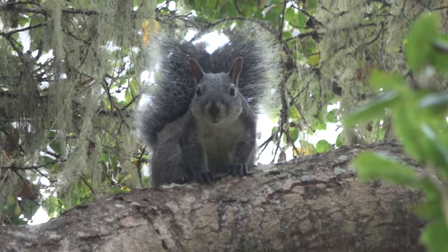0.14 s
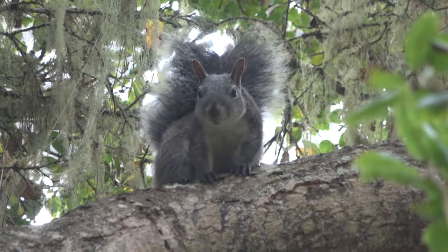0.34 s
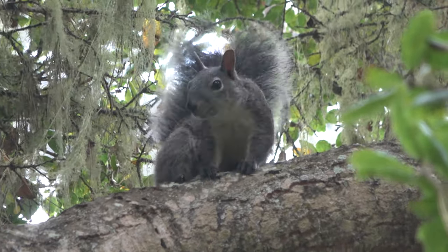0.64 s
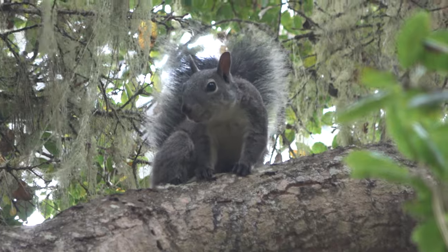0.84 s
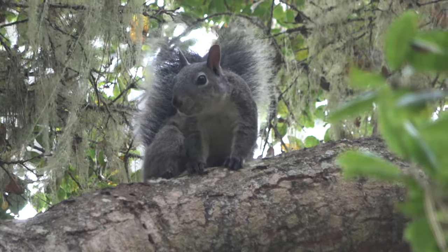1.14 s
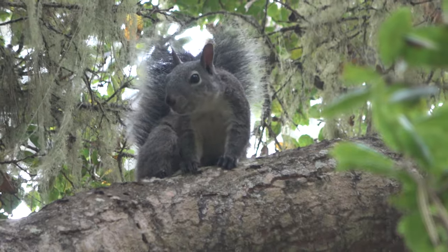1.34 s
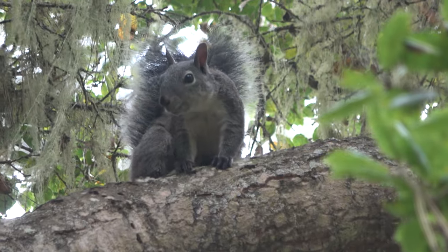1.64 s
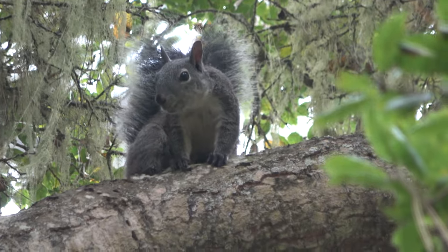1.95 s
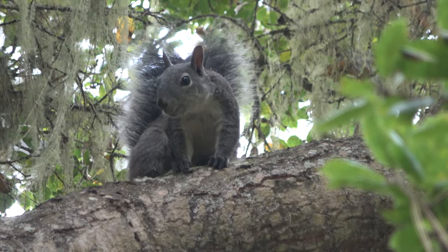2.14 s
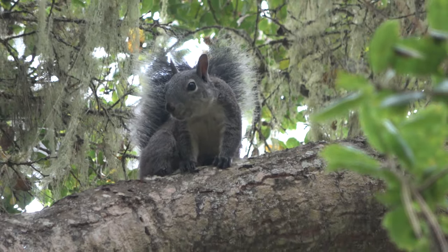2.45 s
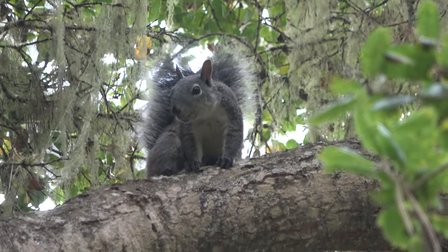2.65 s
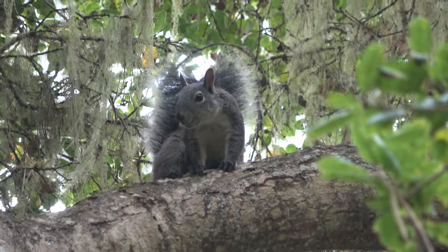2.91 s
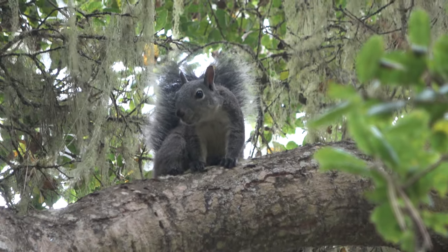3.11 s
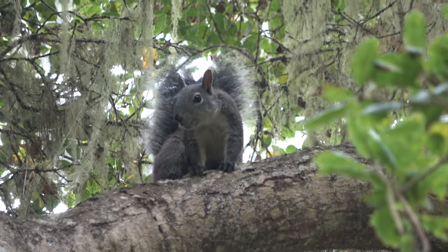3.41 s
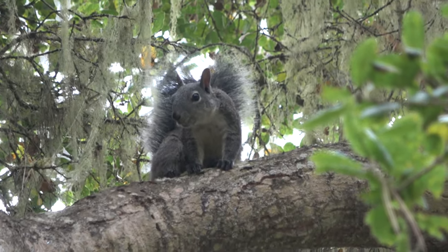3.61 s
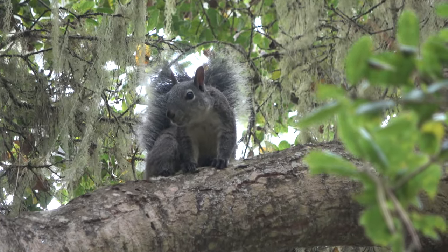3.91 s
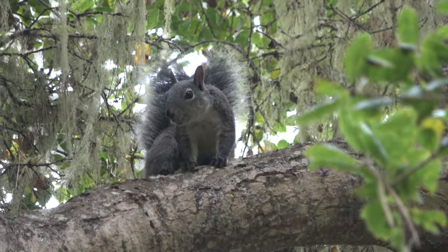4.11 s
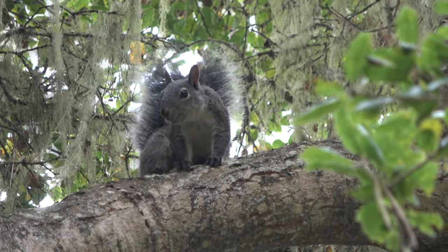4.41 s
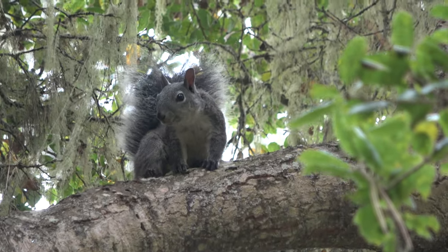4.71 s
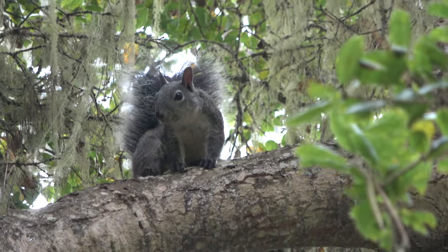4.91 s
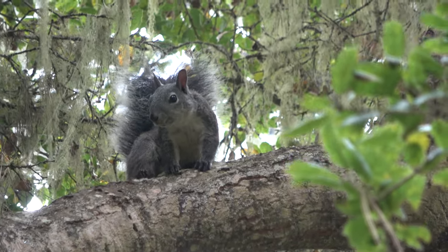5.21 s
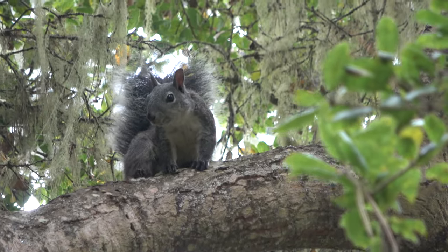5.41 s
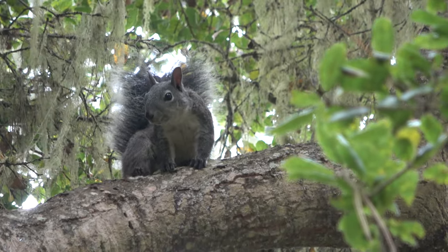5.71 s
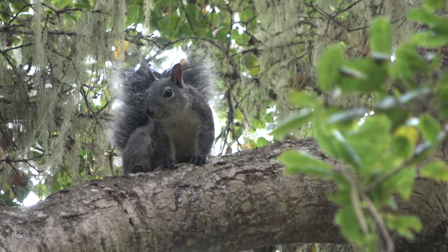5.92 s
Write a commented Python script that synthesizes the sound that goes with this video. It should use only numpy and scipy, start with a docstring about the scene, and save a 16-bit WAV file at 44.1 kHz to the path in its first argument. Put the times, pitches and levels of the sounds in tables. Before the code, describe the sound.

A squirrel sits on a tree limb and scolds. After almost a second of soft woodland air and a dry tick, harsh chirping barks come about four a second, each answered by a small throaty grunt. Gradually they spread out, growing longer, purer and more whistle-like, with fainter grunts. Short reflections ring from the trunks. After the thirteenth call only low steady rumble, ticks and slight rustles remain. Outdoor stereo pickup, fairly near.

```python
"""Squirrel alarm barks among trees

A squirrel gives thirteen barks: a rising whistle-like voice that breaks into a rasp when pushed high.
Whistle and rasp are sums of sine waves, with throat-shaped noise in the rasp; the voice clears as it goes on.
Low falling grunts follow all but one bark, and a fading noise tail makes the echo from the trees.
Behind are shaped noise for rumble, leaf hiss, ticks and rustles, and a faint bird made of gliding sines."""
import sys
import numpy as np
from scipy import signal
from scipy.fft import rfft, irfft
from scipy.io import wavfile
from scipy.ndimage import uniform_filter1d

SR = 44100
rng = np.random.default_rng(int(sys.argv[2]) if len(sys.argv) > 2 else 0)


def store_wav(level_fs):
    """Save 16-bit WAV to argv[1]."""
    pcm = np.round(np.clip(np.atleast_2d(level_fs), -1, 1) * 32767)
    wavfile.write(sys.argv[1], SR, pcm.T.astype(np.int16))


N = 267025  # length of the scene in samples

# Background noise colour: f/Hz, relative level/dB
AIR_COLOUR = [(15, -20), (25, -4.5), (96, -8.5), (179, -0.5), (290, -1), (360, -4), (484, -7.5),
              (525, -11.5), (687, -9), (875, -17.5), (1180, -18), (2020, -31), (4060, -39.5), (6430, -36),
              (15600, -44.5)]
# How alike the background is left and right: f/Hz, likeness (0-1)
AIR_LIKENESS_BY_PITCH = [(60, 0.98), (180, 0.99), (550, 0.99), (1650, 0.89), (4970, 0.76), (15000, 0.16)]
# Background balance: f/Hz, left minus right/dB
AIR_LEFT_RIGHT = [(60, -1.5), (150, -4.5), (380, -4.5), (950, -1.5), (2380, -3.0), (5980, 0), (15000, -0.5)]
# Deep rumble that comes and goes: t/s, level/dB
RUMBLE_LEVEL = [(0.0, -82), (1.9, -50), (2.55, -57), (4.2, -70), (4.6, -57), (6.05, -79)]
# Faint bird notes: t/s, length/s, first f/Hz, top f/Hz, level before its arch and flicker/dB
BIRD_NOTES = [(0.174, .18, 6600, 7330, -65), (0.502, 0.16, 6750, 7360, -73)]
# Leaf rustles: t/s, length/s, level before grain, edges and balance/dB, centre f/Hz
LEAF_RUSTLES = [(0, 0.032, -68, 8000), (0.329, 0.12, -57, 8000), (0.554, 0.24, -73, 6500),
                (3.97, 0.028, -54, 6000), (3.981, 0.086, -63, 6000), (5.093, 0.13, -61.5, 6800),
                (5.988, 0.067, -67, 7100)]
# Ticks: t/s, relative level/dB, centre f/Hz, left minus right/dB
TICK_EVENTS = [(0.0653, -45, 5100, -0.5), (0.352, -18, 3230, -7), (0.4284, -35.5, 7300, -5),
               (0.4354, -40, 7850, -2.5), (0.471, -38, 6070, -3.0), (0.7263, -44.5, 7150, -2.5),
               (1.2424, -37, 3400, -4), (4.4026, -40, 5100, 2), (4.5875, -32, 3860, -6),
               (4.79, -44, 6410, -1.0), (4.9288, -41, 3260, -1), (5.1074, -39, 6400, -5.0),
               (5.128, -41, 6320, 8), (5.4256, -45, 5500, -6), (5.5653, -38, 5000, -7),
               (5.691, -39.5, 6660, -4), (5.827, -39.5, 6130, -0.5), (5.9945, -38, 5840, -1)]
# Echo from the trees: f/Hz, time to fade by 60 dB/s, relative level/dB, stereo width (0-1)
TREE_ECHO = [(500, 0.17, -6, 0.2), (1514, 0.24, -11.5, 0.1), (2040, 0.65, -3.5, 0.03),
             (3020, 0.6, -7.5, 0.15), (4430, 0.45, 1, 0), (6500, 0.32, -4, 0.49), (14000, 0.32, -3.5, 0.34)]
# Scatter off the near leaves, opposite in the two channels: f/Hz, level/dB
NEAR_LEAF_SCATTER = [(800, -25), (2200, -30), (3500, -24), (5000, -12), (8000, -10), (15000, -9)]
# Grunts: t/s, level before fade and flicker/dB, start f/Hz
GRUNT_EVENTS = [(0.941, -35, 693), (1.168, -33.5, 720), (1.392, -34.5, 709), (1.619, -33, 702),
                (1.866, -37, 661), (2.11, -42.5, 674), (2.365, -37.5, 567), (2.641, -40.5, 557.5),
                (2.912, -51, 548), (3.185, -46, 548), (3.865, -57, 538), (4.228, -57, 542)]
# Grunt partials: multiple of the pitch, level before the lift of weaker grunts/dB
GRUNT_PARTIALS = [(1, 4), (2, -1), (3, -3.5)]
# Throat and mouth resonances in three ranges: f/Hz, width/Hz, relative level/dB
LOW_RESONANCES = [(2404, 500, -8), (2830, 330, -4.5), (3073, 66, -3.5), (3429, 550, 0.5), (3873, 450, -15)]
MID_RESONANCES = [(5380, 1120, -11.5), (6000, 550, -25), (6540, 910, 5), (8000, 2060, -8)]
HIGH_RESONANCES = [(10370, 900, 1), (11820, 1150, 5.5), (13700, 1600, -4.5), (15050, 1700, -6)]
# Overtones in the same three ranges: base level at effort 0/dB, gain per dB of effort/dB
EFFORT_TO_OVERTONES = [(-38.5, .5), (-38.5, 0.94), (-46, 1.33)]
# Barks: start t/s; knee, top, push and end t/s after the start; f/Hz at start, knee, top and end
# before sag and waver; base fundamental level/dB, effort at the push/dB, lift at 2-4 kHz/dB,
# lift at 5-9 kHz/dB, cycles per slow beat, beat level/dB, base chaos (0-1)
BARK_EVENTS = [ (0.838, 0.019, 0.036, 0.054, 0.09, 992, 1428, 1669, 1593, -27, 1.5, -0.65, -0.5, 3, 0.5, 0.99),
               (1.075, 0.011, 0.02, 0.046, 0.086, 1115, 1404, 1646, 1646, -28, -0.5, -0.61, 0, 3, 1.5, 0.97),
               (1.297, .014, .028, 0.046, 0.084, 1178, 1373, 1672, 1555, -27.5, -0.5, -1, 1, 3, 0.5, 0.91),
               (1.519, .012, 0.026, 0.05, 0.092, 1173, 1355, 1673, 1600, -28, -1.5, 0.28, 2, 3, 0, 0.84),
               (1.753, .015, 0.031, 0.047, 0.1, 1147, 1393, 1682, 1576, -28.5, -1.5, 0, 2.5, 2, 1.5, 0.5),
               (1.990, 0.016, 0.047, .055, 0.11, 1171, 1410, 1684, 1572, -29.5, -0.5, -1, 1, 3, -2.5, 0.21),
               (2.235, 0.023, .058, 0.074, 0.11, 1217, 1486, 1662, 1636, -30, -2, -0.53, 3, 3, -6, 0.19),
               (2.496, 0.043, .085, 0.085, 0.11, 1192, 1567, 1635, 1585, -29, -4.5, 0.69, 4.5, 4, -10, 0.47),
               (2.766, .042, 0.097, .100, .124, 1224, 1545, 1579, 1512, -30, -4.5, 1, 2.5, 4, -12, 0.08),
               (3.042, 0.054, 0.098, 0.084, 0.12, 1155, 1545, 1563, 1535, -28, -5, 0.52, 0.5, 4, -12.5, 0.51),
               (3.337, 0.076, 0.086, 0.11, 0.13, 1172, 1554, 1555, 1519, -29.5, -9, -0.18, 0, 4, -11, 0.63),
               (3.727, 0.029, .093, 0.1, 0.12, 1246, 1317, 1512, 1445, -30.5, -13.5, -1.25, 0, 4, -12, 0.095),
               (4.085, 0.054, .100, 0.15, .123, 1207, 1313, 1430, 1425, -29.5, -14, -0.62, 0, 4, -12, .08),
               ]
# Balance of the fundamental: t/s, left minus right/dB
FUNDAMENTAL_LEAN = [(0.85, -2.5), (1.1, 1), (2.1, 1), (3.1, 3), (4.2, -1)]

LEFT_RIGHT = np.array([[1], [-1]])  # opposite signs in the two channels
CUTOFF_HZ = 15750
AIR_DB = -42.5
TICK_OCTAVES = 0.62
FAINT_TICKS, FAINT_TICK_DB = 4, -49  # extra ticks at random times, around this relative level
NEAR_S = .004  # decay time of the near scatter

# Grunts: higher ones last longer, and weaker ones have stronger high multiples
GRUNT_FALL = 0.49  # share of the pitch lost by the end
GRUNT_LOW_HZ, GRUNT_S, GRUNT_S_PER_KHZ = 553.5, 0.0297, 0.149
GRUNT_FULL_DB, WEAK_LIFT = -35.5, 0.3  # lift in dB per multiple for each dB below full

THROAT_DIP_HZ = 1750  # the throat passes little just above the fundamental
# The series starts hoarse and clears around this time, this gradually
CLEARS_S, CLEARS_OVER_S = 2.1, .28
# Barks that reach this high break around the knee, this quickly
BREAKS_ABOVE_HZ, BREAK_S = 1530, .008
# Chaos grows along a hoarse bark, and with each 1000 Hz/s of glide
CHAOS_GROWTH, GLIDE_CHAOS = .25, .035
# The fundamental swells up to a full pitch, which is lower for a hoarse voice
FULL_HZ, HOARSE_EARLIER_HZ, SWELL_DB_PER_KHZ = 1430, 40, 92
# A hoarse voice loses fundamental from knee to top, and fades after the push
BROKEN_LOSS_DB, BROKEN_FADE_DB_PER_S = 4.5, 80
# Effort builds to the push, then slackens; a lower start is a softer start
ONSET_EFFORT_DB, PUSH_BEND, SLACK_DB_PER_S = -24, 2.03, 150
ONSET_HZ, ONSET_DB_PER_KHZ = 1180, 45
FOURTH_RING = 0.13  # power of the resonance heard as the fourth multiple crosses it
CLOSING_DB, CLOSING_S = 5.5, 0.021  # a clear bark flares at 2-4 kHz as it is cut off
END_SAG, END_SAG_S = 0.065, 0.013  # the pitch drops as the folds close, most in a clear voice
OPENING_S, RELEASE_S, HOARSE_RELEASE_S = .004, .007, .014  # edges of the overtones
# Near the push a hoarse fundamental splits: pitch ratio, full level, time spread
UNDERTONE, UNDERTONE_DB, UNDERTONE_S = 0.79, -5, 0.0094


def amp(db):
    """Turn decibels into gain."""
    return 10 ** (np.asarray(db) / 20)


def rms_one(x):
    """Scale a sound to an average (rms) strength of 1."""
    return x / np.sqrt(np.mean(x ** 2) + 1e-20)


def at_hz(points, hz, column=1):
    """Read a table between its rows, along a log-frequency axis."""
    points = np.array(points)
    return np.interp(np.log(hz), np.log(points[:, 0]), points[:, column])


def add(out, at, x):
    """Mix x into out from sample at."""
    out[..., at:at + x.shape[-1]] += x[..., :N - at]


def edges(n, rise_s, fall_s):
    """Give a gain curve with a soft start and end."""
    t = np.arange(n) / SR
    return np.clip(t / rise_s, 0, 1) * np.clip(t[::-1] / fall_s, 0, 1)


def wobble(n, hz, count=1):
    """Make slow random motion from low-passed noise, rms 1, in count unrelated rows."""
    sos = signal.butter(2, hz, fs=SR, output="sos")
    rows = signal.sosfilt(sos, rng.standard_normal((count, n + 800)))[:, 800:]  # skip the filter's start
    return np.squeeze(rows / np.sqrt(np.mean(rows ** 2, axis=1, keepdims=True)))


def wide_noise(n, hz, octaves, width):
    """Make a stereo noise burst around hz, rms 1."""
    band = [hz / 2 ** (1.16 * octaves), min(hz * 2 ** octaves, .45 * SR)]
    sos = signal.butter(2, band, "band", fs=SR, output="sos")
    mid, side = signal.sosfilt(sos, rng.standard_normal((2, n)))
    return rms_one(mid + width * side * LEFT_RIGHT)


def air():
    """Far rumble and leaf hiss: noise shaped by frequency in colour, stereo likeness and balance."""
    hz = np.maximum(np.arange(N // 2 + 1) * SR / N, 1)
    mid, side = rfft(rng.standard_normal((2, N)))
    alike = np.clip(at_hz(AIR_LIKENESS_BY_PITCH, hz), 0, 1)
    lean_db = at_hz(AIR_LEFT_RIGHT, hz) / 2
    both = np.sqrt(1 + alike) * mid + np.sqrt(1 - alike) * side * LEFT_RIGHT
    noise = irfft(both * amp(at_hz(AIR_COLOUR, hz) + lean_db * LEFT_RIGHT), N)
    flicker = np.repeat(wobble(N // 50 + 1, 120), 50)[:N]  # each value is held for 50 samples
    return amp(AIR_DB + 0.21 * flicker) * rms_one(noise)


def rumble():
    """Deep rumble: low band-passed noise, alike in both channels."""
    s, level_db = np.transpose(RUMBLE_LEVEL)
    at, end = round(s[0] * SR), round(s[-1] * SR)
    db = np.interp(np.arange(at, end) / SR, s, level_db)
    sos = signal.butter(2, [28, 85], "band", fs=SR, output="sos")
    noise = signal.sosfilt(sos, rng.standard_normal(len(db) + 9000))[9000:]
    out = np.zeros(N)
    add(out, at, amp(db) * rms_one(noise))
    return out


def bird():
    """A thin, quavering whistle: a sine whose pitch and level arch together."""
    out = np.zeros(N)
    for s, length, first_hz, top_hz, db in BIRD_NOTES:
        n = round(length * SR)
        arch = np.sin(np.pi * np.linspace(0, 1, n) ** 1.3)
        hz = first_hz + (top_hz - first_hz) * np.sqrt(arch)
        phase = 2 * np.pi * np.cumsum(hz) / SR + 1.1 * wobble(n, 200)
        level = np.sqrt(2) * amp(db + 4.1 * wobble(n, 80)) * arch ** 1.7
        add(out, round(s * SR), level * np.sin(phase))
    return out


def rustles():
    """Moving leaves: bright noise whose level flickers in fine grains."""
    out = np.zeros((2, N))
    for s, length, db, hz in LEAF_RUSTLES:
        n = round(length * SR)
        grain = amp(db + 3.0 * wobble(n, 200)) * edges(n, 0.0014, .5 * length)
        hiss = wide_noise(n, hz, octaves=0.59, width=0.3)
        add(out, round(s * SR), grain * hiss * amp([[-2], [2]]))
    return out


def ticks():
    """Dry snaps: noise that drops away very fast, with a weaker short tail."""
    out, t = np.zeros((2, N)), np.arange(round(.03 * SR)) / SR
    lowest = [0, FAINT_TICK_DB - 3, 3200, -6]
    highest = [N / SR, FAINT_TICK_DB + 3, 7300, 2]
    faint = rng.uniform(lowest, highest, (FAINT_TICKS, 4))
    fade = np.exp(-t / 0.00081) + 0.1 * np.exp(-t / 0.016)
    for s, db, hz, pan_db in [*TICK_EVENTS, *faint]:
        snap = wide_noise(len(t), hz, TICK_OCTAVES, width=0.16) * fade
        add(out, int(s * SR), amp(db - 8.5) * snap * amp(pan_db / 2 * LEFT_RIGHT))
    return out


def wood(x):
    """Trunks and leaves scatter sound: a noise tail dies band by band, a little different left and right."""
    t, tail = np.arange(round(.9 * SR)) / SR, 0
    for hz in 400 * 2 ** np.arange(0, 5.4, .5):
        sos = signal.butter(2, [hz / 1.19, hz * 1.19], "band", fs=SR, output="sos")
        mid, side = signal.sosfilt(sos, rng.standard_normal((2, len(t))))
        t60 = at_hz(TREE_ECHO, hz)
        even = np.sqrt(2 * np.log(1000) / (t60 * SR))  # offsets the extra energy of a longer fade
        fade = amp(at_hz(TREE_ECHO, hz, column=2) - 60 * t / t60) * even
        tail = tail + fade * (mid + at_hz(TREE_ECHO, hz, column=3) * side * LEFT_RIGHT)
    return signal.fftconvolve(x[None], tail * np.clip(t / 0.0013, 0, 1))[:, :N]


def near_leaves(x):
    """Near leaves widen the voice: brief noise scatter, opposite in the two channels."""
    t = np.arange(round(.02 * SR)) / SR
    scatter = rng.standard_normal(len(t)) * np.exp(-t / NEAR_S)
    scatter = scatter / np.linalg.norm(scatter)
    hz = np.maximum(np.arange(N // 2 + 1) * SR / N, 1)
    side = irfft(rfft(x) * rfft(scatter, N) * amp(at_hz(NEAR_LEAF_SCATTER, hz)), N)
    return side * LEFT_RIGHT


def below_dip(x):
    """Let through what lies below the throat's dip, with a steep low-pass."""
    return signal.sosfilt(signal.butter(8, THROAT_DIP_HZ, fs=SR, output="sos"), x)


def grunts():
    """Short low notes: a few sine multiples whose pitch sags as they fade."""
    out = np.zeros(N)
    for s, db, start_hz in GRUNT_EVENTS:
        length = GRUNT_S + GRUNT_S_PER_KHZ * (start_hz - GRUNT_LOW_HZ) / 1000
        lift_db = WEAK_LIFT * (GRUNT_FULL_DB - db)  # positive below full level
        u = np.linspace(0, 1, round(length * SR))  # progress through the grunt
        n = len(u)
        hz = start_hz * (1 - GRUNT_FALL * u ** 1.376) * (1 + 0.012 * wobble(n, 120))
        phase = 2 * np.pi * np.cumsum(hz) / SR
        note = sum(amp(level_db + lift_db * k) * np.sin(k * phase) for k, level_db in GRUNT_PARTIALS)
        level = amp(db - 12.3 * u ** 0.73 + 2.2 * wobble(n, 72))
        add(out, round(s * SR), level * note * edges(n, 0.011, 0.0038))
    return below_dip(out)


def throat_gain(modes, hz):
    """Give the gain of a set of steep resonances at the given frequencies."""
    return np.sqrt(sum(amp(db) ** 2 / (1 + (2 * (hz - f) / w) ** 2) ** 3 for f, w, db in modes))


def breath_noise(modes, n):
    """Breath turbulence: noise in uneven grains, shaped by the throat, rms 1."""
    source = rng.standard_normal(n + 400) * amp(3.2 * wobble(n + 400, 260))
    hz = np.arange(len(source) // 2 + 1) * SR / len(source)
    return rms_one(irfft(rfft(source) * throat_gain(modes, hz), len(source))[400:])


def overtones(modes, low, high, hz, phase, beat, cycles, chaos):
    """Throat-shaped partials: a slow beat adds more in between, chaos smears each and adds hiss."""
    n = len(hz)
    orders = np.arange(round(low * cycles), round(high * cycles))[:, None] / cycles
    between = np.where(orders % 1 == 0, 1, beat)
    gains = (throat_gain(modes, orders * hz) + 0.0076) * between * (orders * hz < CUTOFF_HZ)
    even = np.sqrt(2 / np.sum(gains ** 2, axis=0))  # steadies the total power before the waver
    waver = amp((2.5 + 0.68 * chaos) * wobble(n, 123, count=len(orders)))
    start_phase = rng.uniform(0, 2 * np.pi, orders.shape)
    smear = start_phase + 1.25 * chaos * wobble(n, 110, count=len(orders))
    lines = even * np.sum(gains * waver * np.sin(orders * phase + smear), axis=0)
    hiss = np.clip(.22 * chaos ** 2 + .012, 0, 1)  # share of the power
    return np.sqrt(1 - hiss) * lines + np.sqrt(hiss) * breath_noise(modes, n)


def fundamental(phase, t, push, hoarse, broken):
    """The whistle-like tone: an unsteady sine, joined near the push by a lower one when hoarse."""
    n = len(t)
    unsteady = hoarse * broken + 0.093
    shaken_phase = phase + .5 * unsteady * wobble(n, 200)
    flicker = amp(5 * unsteady * np.tanh(.8 * wobble(n, 130) - .4))
    split = hoarse * amp(UNDERTONE_DB) * np.exp(-((t - push) / UNDERTONE_S) ** 2)
    return np.sin(shaken_phase) * flicker + split * np.sin(UNDERTONE * phase + wobble(n, 60))


def barks():
    """The voice climbs; high barks break to a rasp until their end, and the series grows clearer."""
    tones, rasps = np.zeros(N), np.zeros(N)
    for (s, knee, top, push, length, *pitch_hz, tone_db, effort_db,
         low_lift_db, lift_db, cycles, beat_db, chaos) in BARK_EVENTS:
        at, n, cycles = round(s * SR), round(length * SR), round(cycles)
        t = np.arange(n) / SR
        late = np.maximum(t - push, 0)
        hoarse = 1 / (1 + np.exp((s - CLEARS_S) / CLEARS_OVER_S))
        hz = np.interp(t, [0, knee, top, length], pitch_hz)
        broken = np.clip((t - knee) / BREAK_S + .5, 0, 1) * (hz.max() > BREAKS_ABOVE_HZ)

        # Level of the fundamental follows the highest pitch reached so far
        reached = np.maximum.accumulate(hz)
        full_hz = FULL_HZ - HOARSE_EARLIER_HZ * hoarse
        tone_db = tone_db - SWELL_DB_PER_KHZ * np.maximum(full_hz - reached, 0) / 1000
        loss_db = BROKEN_LOSS_DB * np.clip((t - knee) / (top - knee), 0, 1)
        tone_db = tone_db - hoarse * (loss_db + BROKEN_FADE_DB_PER_S * late)

        # Levels of the overtones follow the effort
        onset_db = ONSET_EFFORT_DB + ONSET_DB_PER_KHZ * (hz[0] - ONSET_HZ) / 1000
        build = np.clip(1 - t / push, 0, 1) ** PUSH_BEND
        effort = effort_db - (effort_db - onset_db) * build - SLACK_DB_PER_S * late
        low_db, mid_db, high_db = (db + share * effort for db, share in EFFORT_TO_OVERTONES)
        closing_db = CLOSING_DB * (1 - hoarse) * np.exp((t - length) / CLOSING_S)
        low_db = low_db + low_lift_db + closing_db
        ringing = throat_gain(MID_RESONANCES, 4 * hz) ** FOURTH_RING

        glide = uniform_filter1d(np.abs(np.gradient(hz)) * SR / 1000, size=200)
        chaos = chaos + CHAOS_GROWTH * hoarse * t / length + GLIDE_CHAOS * glide
        chaos = np.clip(broken * chaos, 0, 1)
        beat = broken * amp(beat_db)

        hz = hz * (1 - END_SAG * (1 - hoarse) * (1 - edges(n, 1e-4, END_SAG_S)))
        shaken_hz = hz * (1 + (0.005 + 0.008 * chaos) * wobble(n, 180))
        phase = 2 * np.pi * np.cumsum(shaken_hz) / SR

        tone = fundamental(phase, t, push, hoarse, broken)
        add(tones, at, np.sqrt(2) * amp(tone_db) * tone * edges(n, 0.0013, 0.0024))
        voice = (hz, phase, beat, cycles, chaos)
        rasp = amp(low_db) * overtones(LOW_RESONANCES, 1.3, 3.3, *voice)
        rasp += amp(mid_db + lift_db) * ringing * overtones(MID_RESONANCES, 2.8, 7.3, *voice)
        rasp += amp(high_db) * overtones(HIGH_RESONANCES, 5.8, 13, *voice)
        add(rasps, at, rasp * edges(n, OPENING_S, RELEASE_S + HOARSE_RELEASE_S * hoarse))
    return below_dip(tones), rasps


def scene():
    """Place the squirrel almost in the middle, with its echo and the background around it."""
    background = air() + rumble() + bird() + rustles() + ticks()
    tone, rasp = barks()
    rest = rasp + grunts()
    lean_db = np.interp(np.arange(N) / SR, *np.transpose(FUNDAMENTAL_LEAN)) / 2
    direct = tone * amp(lean_db * LEFT_RIGHT) + rest * amp(.1 * LEFT_RIGHT)
    return background + wood(tone + rest) + near_leaves(tone + rest) + direct


def record(dry):
    """Cut the top with a steep low-pass."""
    return signal.sosfilt(signal.ellip(12, .5, 70, CUTOFF_HZ, fs=SR, output="sos"), dry)


dry = scene()
out = record(dry)
store_wav(out)
```